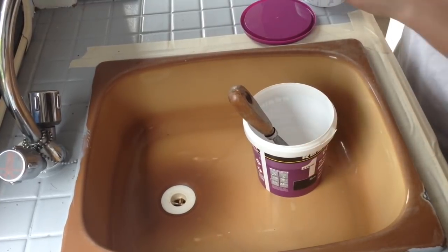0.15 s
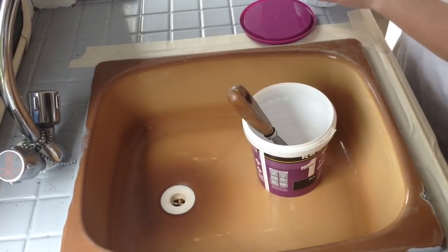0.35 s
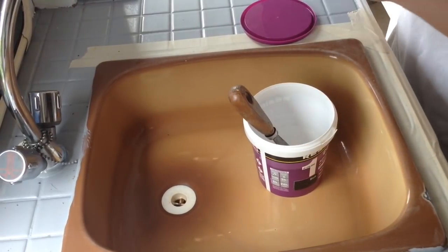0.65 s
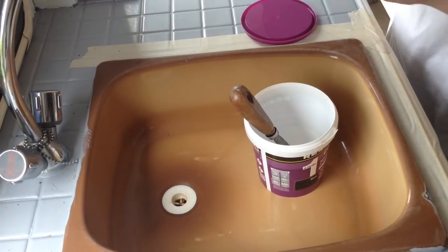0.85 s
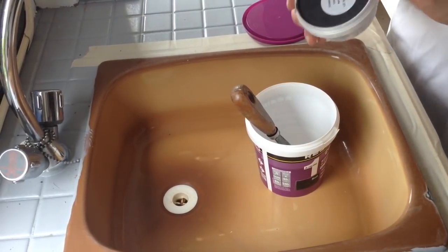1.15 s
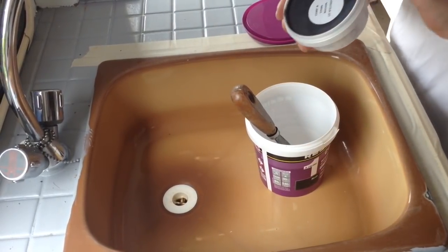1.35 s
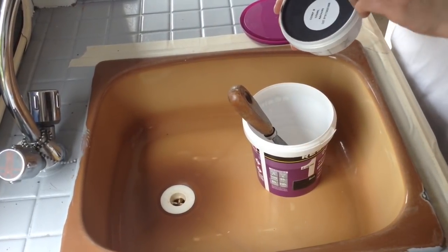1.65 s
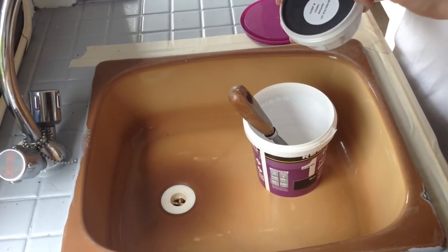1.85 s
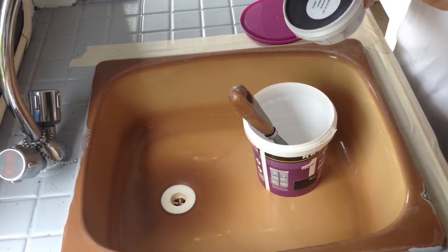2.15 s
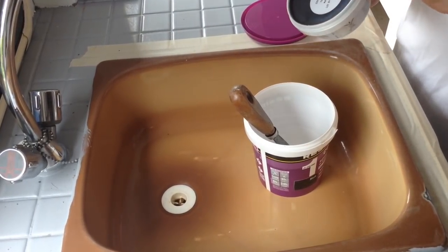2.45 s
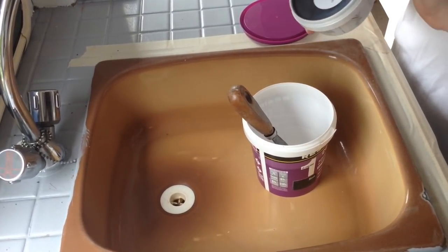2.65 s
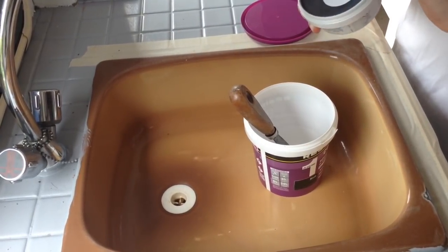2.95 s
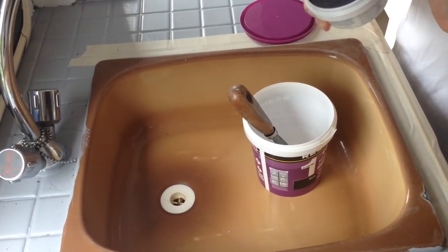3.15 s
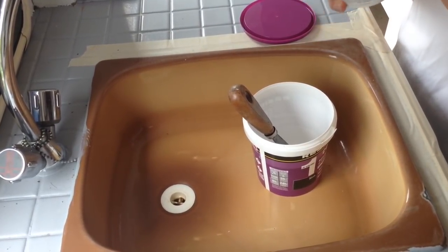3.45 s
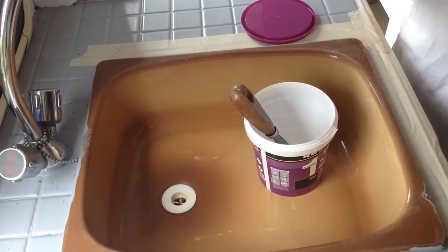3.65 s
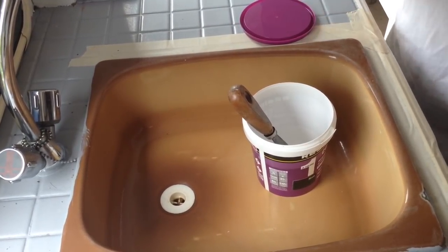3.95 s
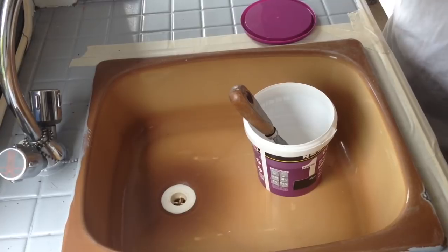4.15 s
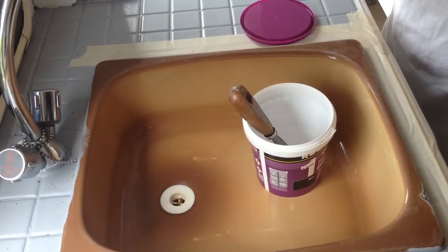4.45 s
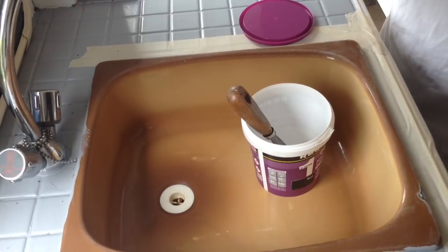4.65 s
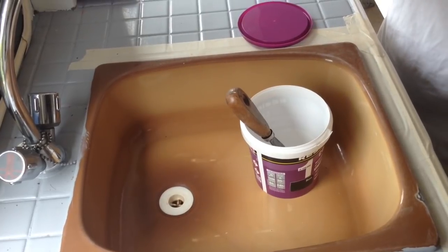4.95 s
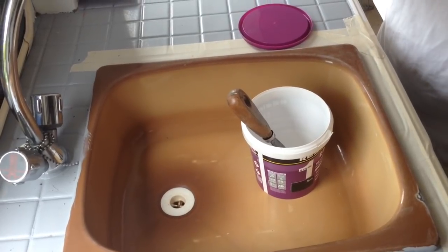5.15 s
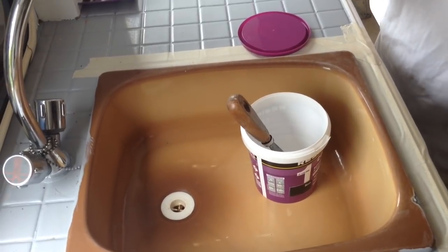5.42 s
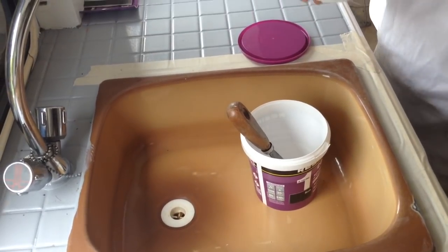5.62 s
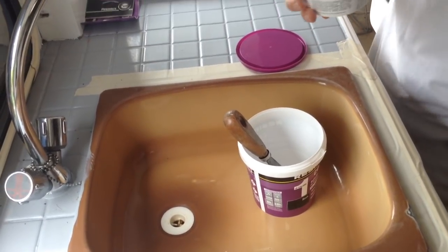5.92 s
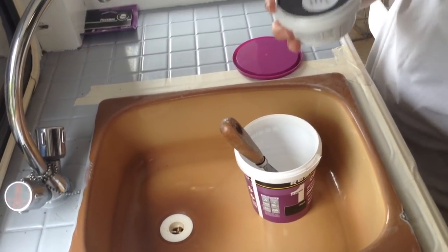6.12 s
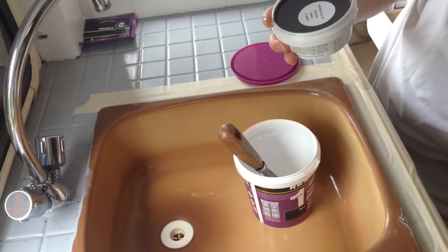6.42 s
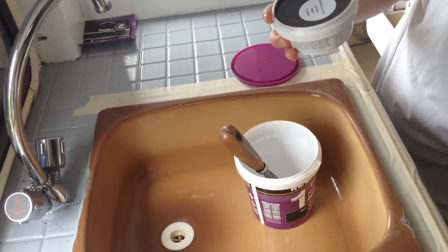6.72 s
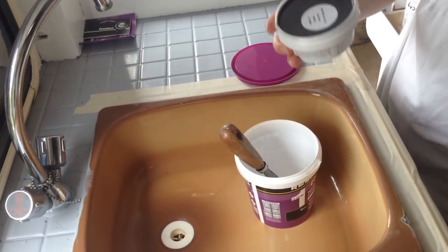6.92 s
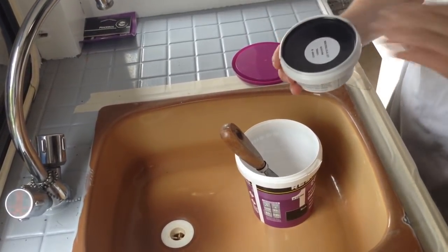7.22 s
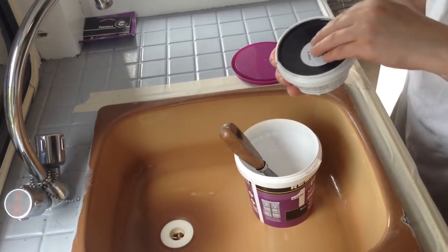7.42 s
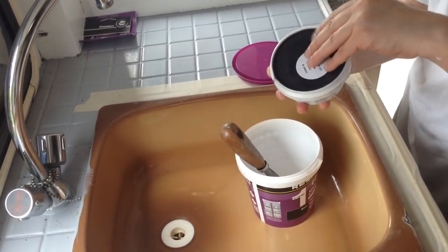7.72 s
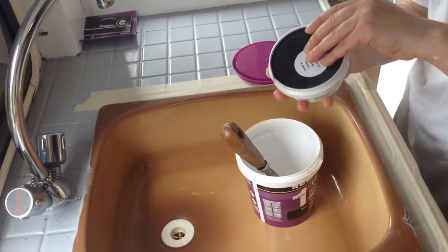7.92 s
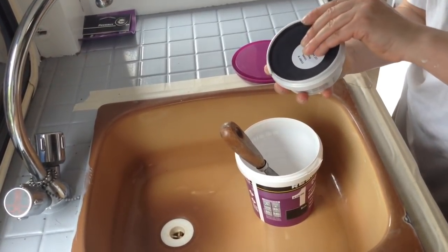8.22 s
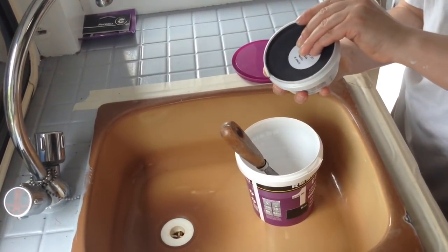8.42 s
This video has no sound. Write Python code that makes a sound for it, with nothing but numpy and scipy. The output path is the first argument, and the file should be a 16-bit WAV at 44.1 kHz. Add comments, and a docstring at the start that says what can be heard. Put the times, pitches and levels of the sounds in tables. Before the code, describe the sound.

A plastic lid is pressed onto a tub with crisp snaps, soft finger ticks and dull counter bumps, while small birds chirp.

```python
"""Pressing a lid onto a plastic tub

Over a sink in a tiled kitchenette, fingers rub and tick on a small tub. The lid's rim snaps over its bead
(the ridge that holds it on) in a few sharp cracks that set the plastic ringing. Now and then something
bumps the hollow counter. Small birds chirp outside, over a quiet room rumble."""
import sys
import numpy as np
from scipy import signal
from scipy.fft import rfft, irfft
from scipy.io import wavfile
from scipy.ndimage import uniform_filter1d

SR = 44100
rng = np.random.default_rng(int(sys.argv[2]) if len(sys.argv) > 2 else 0)


def transcribe(signal):
    """Save signal, clipped to [-1, 1], as a 16-bit WAV file at the path in sys.argv[1]."""
    frames = np.atleast_2d(signal).T
    limited = np.clip(frames, -1, 1)
    pcm = np.round(limited * 32767).astype(np.int16)
    wavfile.write(sys.argv[1], SR, pcm)


N = 377937
TIME = np.arange(N) / SR
RING = np.arange(16384) / SR  # the clock of one short sound, in seconds
FREQ = np.maximum(np.fft.rfftfreq(len(RING), 1 / SR), 1)


def undb(db):
    """Turn decibels into a gain."""
    return 10 ** (np.asarray(db) / 20)


def unit(x):
    """Scale to an average (rms) level of 1."""
    return x / np.sqrt(np.mean(x ** 2))


def fade(t60):
    """Die away by 60 dB in t60 seconds, the ring time."""
    return np.exp(-np.log(1000) * RING / t60)


def noise():
    """White noise for one short sound."""
    return rng.standard_normal(len(RING))


def add(out, s, x):
    """Mix x into out, starting at s seconds."""
    i = max(int(s * SR), 0)
    out[i:i + len(x)] += x[:len(out) - i]


def scattered(start, end, count):
    """Random moments, one in each equal part of a stretch of time."""
    return start + (end - start) * (np.arange(count) + rng.random(count)) / count


def spectrum(points):
    """Gain at each FREQ, on a curve through (Hz, dB) points."""
    hz, db = np.transpose(points)
    return undb(np.interp(np.log(FREQ), np.log(hz), db))


def resonance(hz, width):
    """Gain at each FREQ for one peak, 1 at its centre."""
    return 1 / np.hypot(1, (FREQ / hz - hz / FREQ) * hz / width)


def colour(x, gain):
    """Filter x by a gain at each FREQ, so that it rings after a hit and never before."""
    cepstrum = irfft(np.log(gain + 1e-7))
    half = len(cepstrum) // 2
    cepstrum[1:half] *= 2
    cepstrum[half + 1:] = 0
    response = irfft(np.exp(rfft(cepstrum)))
    return signal.fftconvolve(x, response)[:len(x)]


def no_bass(x, hz):
    """Small objects give off almost nothing below hz."""
    return signal.sosfilt(signal.butter(4, hz, "high", fs=SR, output="sos"), x)


def ring(tones, scatter):
    """A struck object's tones; each blow lands elsewhere, so signs flip and pitches shift a little."""
    chance = rng.standard_normal((len(tones), 2))
    return sum(undb(db) * np.sign(side) * fade(t60) * np.sin(2 * np.pi * hz * (1 + scatter * off) * RING)
               for (hz, db, t60), (side, off) in zip(tones, chance))


# The tone of the room's noise. Each row: frequency in Hz, relative level in dB.
ROOM_TONE = [(18, -77.5), (30, -48.5), (64, -37.5), (81, -24.5), (167, -2), (200, -3), (267, -3), (364, -9),
             (426, -4), (472, -6.5), (612, -5.5), (859, -9), (1030, -6.5), (1340, -12), (15000, -19.5)]

def room(level_db=-60, split_hz=500, fade_db=-1.0):
    """Steady hiss over a low rumble that wavers slightly; both ease off slowly."""
    gain = spectrum(ROOM_TONE)
    low_share = 1 / np.hypot(1, (FREQ / split_hz) ** 2)
    waver_db = .8 * np.interp(TIME, np.linspace(0, TIME[-1], 120), rng.standard_normal(120))
    rumble = colour(rng.standard_normal(N), gain * low_share) * undb(waver_db)
    hiss = colour(rng.standard_normal(N), gain * np.sqrt(1 - low_share ** 2))
    return undb(level_db + fade_db * (TIME / TIME[-1] - .5)) * unit(rumble + hiss)


def chirp(length, middle_hz, glide_oct, rough, rasp_depth=.1):
    """A bird's gliding whistle; a rough one wavers fast in pitch and level."""
    progress = np.minimum(RING / length, 1)
    rasp = rasp_depth * unit(uniform_filter1d(noise(), size=30))
    hz = middle_hz * 2 ** (glide_oct * (progress - .5)) * (1 + rough * rasp)
    flutter = unit(1 + rough * unit(uniform_filter1d(noise(), size=150)))
    swell = 2 * np.sqrt(progress * (1 - progress))
    return flutter * swell * np.sin(2 * np.pi * np.cumsum(hz) / SR)


# Notes of nearby birds. Each row: start in seconds, length in seconds, middle pitch in Hz,
# glide in octaves, level in dB, roughness from 0 to 1.
BIRD_NOTES = [(0.039, 0.068, 3560, 0.091, -52, 0.47), (.084, .035, 4620, -.09, -57, .1),
              (.132, 0.21, 3640, 0.048, -66, .15), (.387, 0.045, 4140, .06, -57, .6),
              (.487, .03, 7470, -.09, -58.5, .4), (0.51, .064, 6630, -0.11, -57, 0.15),
              (0.539, .1, 3590, -.22, -53, 0.62), (0.638, 0.07, 5700, -0.14, -56, 0.23),
              (.705, 0.02, 3840, .33, -53, 0.4), (0.863, 0.055, 3620, -0.076, -53.5, 0.32),
              (1.106, 0.063, 3140, .08, -54.5, .15), (1.162, 0.081, 3655, -0.1, -50, 0.2),
              (1.293, .07, 3250, -0.053, -59.5, .15), (1.38, 0.059, 3690, -0.057, -62, .05),
              (1.648, .023, 3660, 0.32, -57.5, 0.44), (1.87, 0.13, 4990, -.03, -63.5, 0.1),
              (2.711, 0.035, 3720, -.14, -52, 0.26), (4.57, .042, 3830, .18, -60.5, 0.36),
              (5.126, 0.045, 2630, .08, -60, 0.8), (5.294, .043, 3790, -0.089, -54.5, .45),
              (5.675, .05, 4770, -.13, -59.5, .38), (5.75, .032, 3760, .2, -59.5, .3),
              (5.89, 0.075, 3620, -.17, -55.5, 0.5), (6.181, .035, 3930, 0.16, -54, .4),
              (7.304, 0.077, 4070, 0.17, -58, .8), (7.45, .03, 4040, 0.081, -60.5, .5),
              (7.937, 0.11, 2560, 0.16, -56.5, 0.82), (8.27, .064, 3920, -0.021, -57, 0.58)]

def birds(level_db=-2, echo_db=-2, echo_t60=.36, far_hz=4200, far_db=-68, far_until_s=6.3):
    """Near notes, fainter birds at random further off, and the echo of the yard."""
    out = np.zeros(N)
    for s, length, hz, glide_oct, db, rough in BIRD_NOTES:
        add(out, s, undb(db) * chirp(length, hz, glide_oct, rough))
    for s in far_until_s * scattered(0, 1, count=14) ** 2:  # busiest at the start
        stretch, pitch, glide = rng.uniform(-1, 1, size=3)
        hz = far_hz * 2 ** (.3 * pitch)
        add(out, s, undb(far_db) * chirp(.08 * 2 ** stretch, hz, glide_oct=.15 * glide, rough=.3))
    yard = noise() * fade(echo_t60)
    echo = signal.fftconvolve(out, yard / np.linalg.norm(yard))[:N]
    return undb(level_db) * (out + undb(echo_db) * echo)


SLIDE_PEAK_S = RING[-1] / 2

def slide(half_s, grain_db=3, hiss_hz=6500, width_hz=5800):
    """Skin slides on plastic in tiny, uneven slips: a hiss that swells and fades."""
    slip_size = np.minimum(rng.exponential(size=len(RING)), 3)
    slips = unit(noise() * undb(grain_db * slip_size))
    swell = np.exp(-((RING - SLIDE_PEAK_S) / half_s) ** 2 / 2)
    return colour(slips * swell, unit(resonance(hiss_hz, width_hz)))


# Firm finger slides. Each row: middle in seconds, half length in seconds, level in dB.
FINGER_RUBS = [(0.326, 0.04, -58), (0.658, .023, -57.5), (.905, .03, -52.5), (.982, 0.018, -49.5),
               (1.221, 0.013, -56), (1.352, 0.02, -55.5), (1.497, .019, -58.5), (3.077, .0084, -52.5),
               (4.087, 0.014, -56.5), (4.172, 0.038, -53.5), (4.671, 0.013, -54.5), (5.823, .024, -60),
               (7.627, 0.025, -63), (7.881, .0038, -51), (8.308, 0.016, -55)]

def finger_rubs():
    """Fingers rub firmly across the plastic."""
    out = np.zeros(N)
    for s, half_s, db in FINGER_RUBS:
        add(out, s - SLIDE_PEAK_S, undb(db) * slide(half_s))
    return out


# The lid's low tones. Each row: pitch in Hz, relative level in dB, ring time in seconds.
LID_TONES = [(186, -6.5, 0.086), (203.4, 1.5, .1), (245, 3, 0.065), (373, -5, 0.1), (410, -7, .1),
             (607.3, -23.5, 0.07), (923, -11.5, 0.093)]

def lid_thump(swell_s, scatter):
    """The lid booms like a drum skin over the trapped air."""
    return ring(LID_TONES, scatter) * (1 - np.exp(-RING / swell_s))


# Spells of handling. Each row: start and end in seconds, slide level in dB, thump level in dB.
GRIP_SHIFTS = [(.7, 1.8, -65, -67), (7.5, 8.399, -68.5, -62)]

def handling(scatter_db=2):
    """Hands turn the tub: fingertips land softly on the lid at random and slide a little."""
    out = np.zeros(N)
    for start, end, slide_db, thump_db in GRIP_SHIFTS:
        for s in scattered(start, end, count=6):
            force = undb(scatter_db * rng.standard_normal())
            add(out, s - SLIDE_PEAK_S, force * undb(slide_db) * slide(half_s=.039))
            add(out, s, force * undb(thump_db) * lid_thump(swell_s=.008, scatter=.016))
    return out


# The overall tone of clicking plastic. Each row: frequency in Hz, relative level in dB.
PLASTIC_TONE = [(150, -22), (900, -15), (2000, -10), (4500, -1.1), (8000, 0), (12500, 0.7), (15000, -4)]
# The shell's high ringing. Each row: pitch in Hz, width of the peak in Hz, relative level in dB.
SHELL_PEAKS = [(5780, 40, -6.5), (6360, 23, -3), (7440, 67, 0.5), (7480, 24, -3.5), (7500, 64, -1.5),
               (7900, 45, -3.5), (8350, 72, 1.5), (8636, 55, 0), (9700, 33, 8), (11100, 63, -5.5),
               (12210, 35, -5), (12700, 130, -6), (14500, 25, -12.5), (14930, 66, -8.5)]
# The wall's slower bending. Each row: pitch in Hz, width of the peak in Hz, relative level in dB.
WALL_PEAKS = [(1200, 43, -13), (1520, 30, -15.5), (1670, 18, -12), (2140, 25.94, -10.5), (2371, 37, -8),
              (2880, 38, -5), (3176, 30, -11), (3630, 79, -4)]

def click(db, thump_db, body_db, t60, crack_db, span=0, contact=1, wall_db=8, near_db=5, body_hz=4000):
    """A crack, the shell and sink ringing close by, then the tiled room; the lid thumps underneath."""
    near = undb(near_db) * fade(t60=.052)
    blow = noise() * np.hypot(near, fade(t60))
    blow[0] = undb(crack_db)  # the crack is a single spike
    body_share = 1 / (1 + (FREQ / body_hz) ** 4)  # the click's lower part, which a gripping hand damps
    gain = contact * spectrum(PLASTIC_TONE) * undb(db + body_db * body_share)
    shell = sum((undb(peak) * resonance(hz, width)) ** 2 for hz, width, peak in SHELL_PEAKS)
    wall = sum((undb(wall_db + peak) * resonance(hz, width)) ** 2 for hz, width, peak in WALL_PEAKS)
    plastic = colour(blow, gain * np.sqrt(1 + shell + wall + span ** 2))
    return plastic + undb(thump_db) * lid_thump(swell_s=.002, scatter=.015)


# Fingers landing on the lid. Each row: start in seconds, then tick level, thump level and body boost in dB.
FINGER_TICKS = [(0.96, -46, -62, -3), (1.212, -51, -62, 0), (1.336, -52.5, -73, 7.5), (1.927, -59, -57, 4),
                (2.141, -51.5, -51.5, 10), (2.169, -64, -51.5, 13), (2.862, -47, -57, -4),
                (2.955, -49, -54, -2), (3.121, -58, -55.5, 2), (3.473, -50.5, -70, 8.5),
                (4.367, -55, -51, 11), (4.461, -54, -52.5, 3), (7.015, -55, -75, 3), (7.655, -66, -61, 3),
                (7.885, -39.5, -52, -3.5), (7.938, -63, -51, 9), (7.977, -67, -57, 5),
                (8.131, -65, -54, 10)]

def finger_ticks(nail_hz=11500):
    """The nail ticks and the fingertip thumps; softer than the rim, a nail adds little above nail_hz."""
    out = np.zeros(N)
    nail = 1 / np.hypot(1, (FREQ / nail_hz) ** 3)
    for s, db, thump_db, body_db in FINGER_TICKS:
        add(out, s, click(db, thump_db, body_db, t60=.12, crack_db=8, contact=nail))
    return no_bass(out, hz=107)


# The counter's own tones. Each row: pitch in Hz, relative level in dB, ring time in seconds.
COUNTER_TONES = [(172, 6.5, 0.16), (262, -2.5, 0.14), (329, -0.5, 0.17), (438, -14, 0.13), (516, -2, 0.24),
                 (604.4, 1.5, 0.22), (646, 2.5, 0.19), (842, -7.5, 0.12), (970, -1.5, 0.09),
                 (1080, -6.5, 0.15), (1168, 0.5, 0.21), (1206, 1, 0.21), (1720, -5.5, 0.14),
                 (1820, -4, .13), (2260, -10, 0.21)]
# Dull bumps. Each row: start in seconds, level in dB, the pitch it shakes most in Hz.
COUNTER_BUMPS = [(1.052, -36, 1710), (1.072, -31.5, 1110), (1.079, -40.5, 1100), (1.094, -35, 610),
                 (1.486, -59.5, 600), (3.505, -59, 1114), (4.05, -56.5, 550), (4.749, -49.5, 695),
                 (4.767, -46, 555), (4.794, -51, 472)]

def counter_bumps(tones_db=-3.7, wash_db=-7, hard_bump_db=-33):
    """Bumps ring the hollow counter; softer contact favours its lower tones, harder contact clatters."""
    out = np.zeros(N)
    for s, db, hz in COUNTER_BUMPS:
        tones = undb(tones_db) * ring(COUNTER_TONES, scatter=.0094)
        wash = undb(wash_db) * colour(noise() * fade(t60=.39), unit(resonance(hz=520, width=1460)))
        thud = colour(tones + wash, resonance(hz, width=.7 * hz))
        clatter_db = -12.5 + .2 * min(db - hard_bump_db, 0)
        clatter = colour(noise() * fade(t60=.23), unit(resonance(hz=4000, width=3300)))
        add(out, s, undb(db) * (thud + undb(clatter_db) * clatter))
    return no_bass(out, hz=125)


# The rim snapping shut. Each row: start in seconds, then snap level, thump level and body boost in dB,
# ring time and creep time in seconds, then the freed span's pitch in Hz and relative level in dB.
RIM_SNAPS = [(2.4218, -16, -30, -1, 0.14, .001, 5560, -1.5),
             (2.6436, -32.5, -43, 1, 0.12, 0.00076, 3840, 8),
             (2.7553, -18.5, -52, -9.5, 0.14, 0.0083, 7520, 13),
             (3.179, -16.5, -47, -5, .15, .0005, 8160, 11), (4.984, -20, -59, 1, .14, .0015, 13300, 1),
             (5.2146, -14.5, -38, -1, 0.17, 0.0011, 4400, 0.5)]

def rim_snaps(creep_db=-13, full_snap_db=-16.5):
    """The rim creeps over the bead, then jumps, and the freed span of rim rings."""
    out = np.zeros(N)
    for s, db, thump_db, body_db, t60, creep_s, span_hz, span_db in RIM_SNAPS:
        crack_db = 21.5 + .7 * (db - full_snap_db)  # a harder snap has a sharper first crack
        span = undb(span_db) * resonance(span_hz, width=1100)
        add(out, s, click(db, thump_db, body_db, t60, crack_db, span))
        creep = colour(noise() * (RING < creep_s), unit(resonance(hz=8000, width=4000)))
        add(out, s - creep_s, undb(db + creep_db) * creep)
    return no_bass(out, hz=107)


def scene():
    """All the sounds together in one channel."""
    indoors = rim_snaps() + finger_ticks() + counter_bumps() + finger_rubs() + handling()
    return (indoors + birds() + room())[None]


def record(dry, top_hz=15280):
    """The sharpest cracks clip, and the highest treble is cut."""
    treble_cut = signal.ellip(12, .2, 90, top_hz, fs=SR, output="sos")
    return signal.sosfilt(treble_cut, np.clip(dry, -1, 1))


dry = scene()
out = record(dry)
transcribe(out)
```